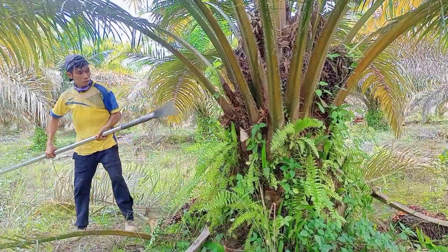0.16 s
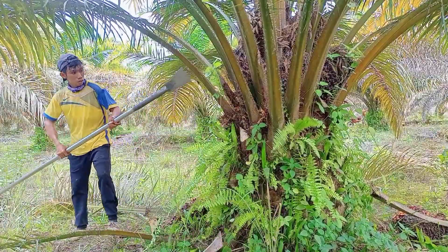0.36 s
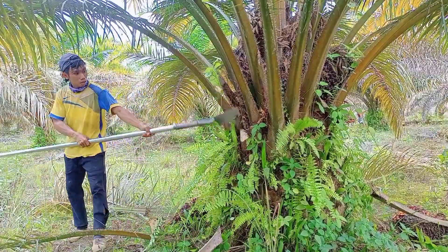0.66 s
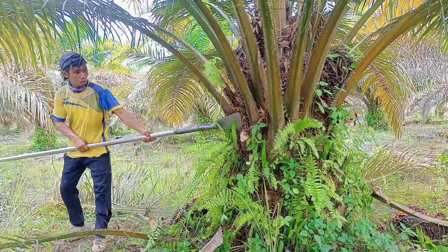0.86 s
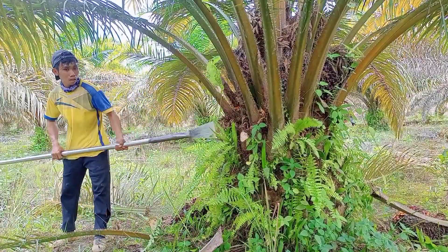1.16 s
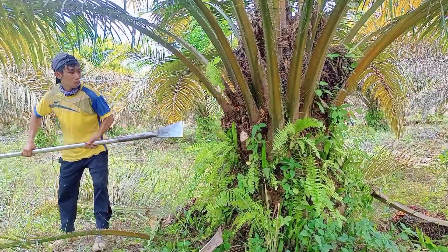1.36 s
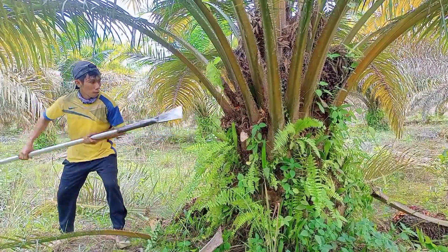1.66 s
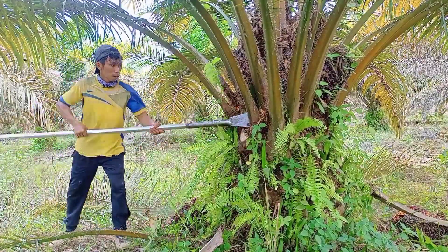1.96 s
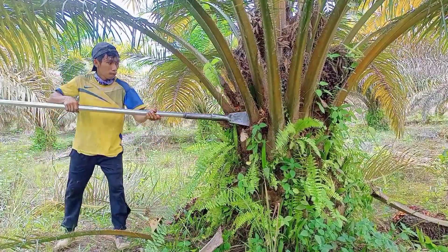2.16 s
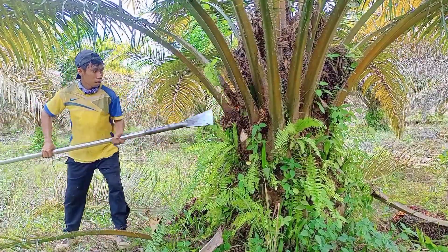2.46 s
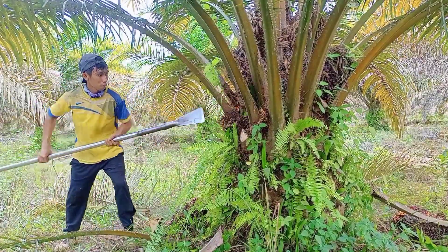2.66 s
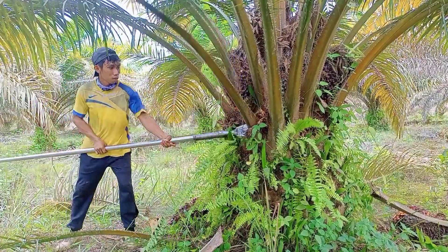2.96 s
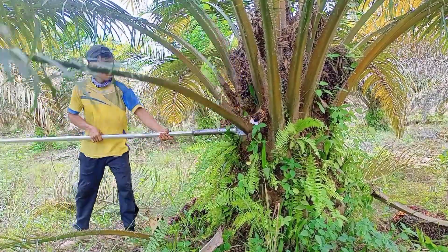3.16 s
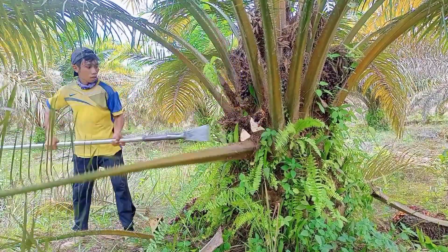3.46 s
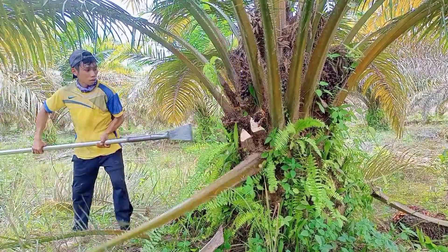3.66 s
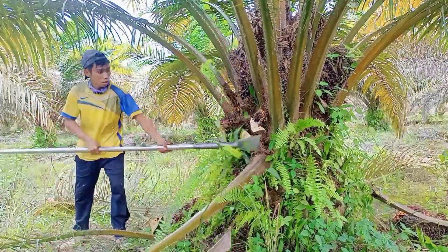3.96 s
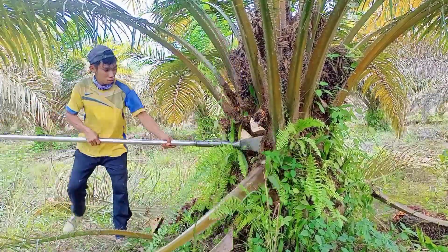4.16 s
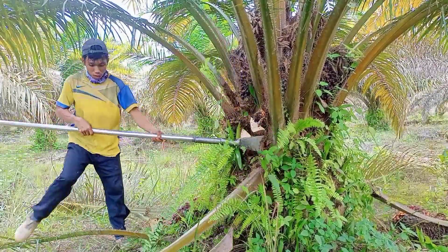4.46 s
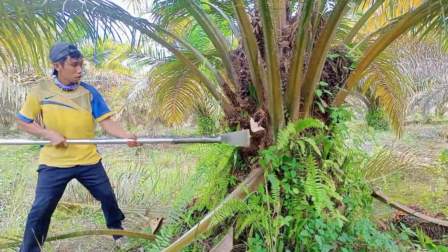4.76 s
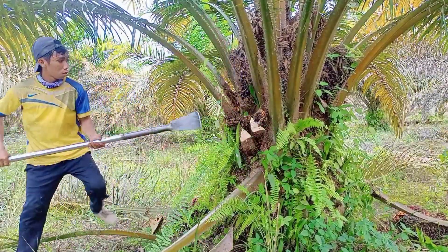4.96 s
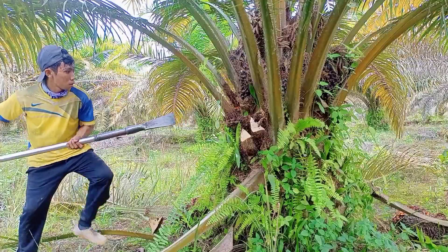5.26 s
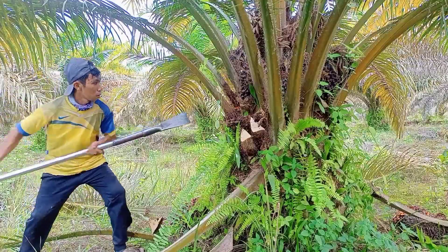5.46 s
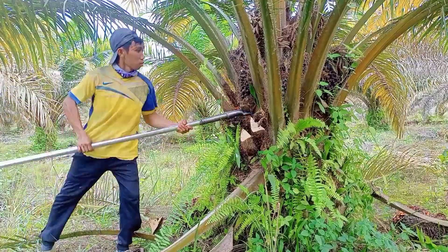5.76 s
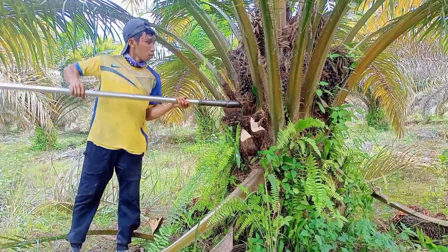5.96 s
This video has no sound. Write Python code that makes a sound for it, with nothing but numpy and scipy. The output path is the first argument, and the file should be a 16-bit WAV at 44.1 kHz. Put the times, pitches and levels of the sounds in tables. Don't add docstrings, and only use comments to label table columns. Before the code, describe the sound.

In a breezy plantation with faint insects, a long-poled steel chisel chops wet palm stalks with sharp crunching thuds, leaves rustling, then splintering and a short creak.

```python
import sys
import numpy as np
from scipy import signal
from scipy.fft import rfft, irfft
from scipy.io import wavfile
from scipy.ndimage import uniform_filter1d

SR = 44100
rng = np.random.default_rng(int(sys.argv[2]) if len(sys.argv) > 2 else 0)


def boost(x):
    u = np.asarray(x, float) / 20
    return 10 ** u


def materialize(psi):
    bounded = np.clip(np.atleast_2d(psi).T, -1, 1)
    quanta = np.round(bounded * 32767).astype(np.int16)
    wavfile.write(sys.argv[1], SR, quanta)


N = 269892

# start_s, effort_db
LEVER = [
    (5.39, -82),
    (5.47, -41.5),
    (5.58, -45),
    (5.66, -40),
    (5.71, -39),
    (5.76, -39),
    (5.9, -42),
    (5.97, -56),
    (6.12, -57.5),
]


def unit(x):
    return x / np.sqrt(np.mean(x ** 2))


def band(x, hz, width_hz):
    hz = min(hz, .45 * SR)
    return signal.lfilter(*signal.iirpeak(hz, max(hz / width_hz, .3), fs=SR), x)


def cut(x, hz, kind):
    return signal.lfilter(*signal.butter(2, hz, kind, fs=SR), x)


def colour(x, points):
    hz, db = np.transpose(points)
    bins_hz = np.fft.rfftfreq(8192, 1 / SR)
    log_gain = np.interp(np.log(bins_hz + 1), np.log(hz), db) * np.log(10) / 20
    cepstrum = irfft(log_gain)
    cepstrum[1:4096] *= 2
    cepstrum[4097:] = 0
    response = irfft(np.exp(rfft(cepstrum)))
    return signal.fftconvolve(x, response)[:len(x)]


def walk(rate):
    k = int(SR / rate)
    held = np.repeat(rng.standard_normal(N // 40 + 2)[:N // k + 1], k)
    return 1.3 * uniform_filter1d(uniform_filter1d(held, k), k)[:N]


def crackle(scatter_db, grain_s):
    size = boost(scatter_db * np.minimum(rng.exponential(size=N // 8), 5))
    place = (np.arange(N) / max(grain_s * SR, 8)).astype(int)
    return unit(size[place] * rng.standard_normal(N))


def fade(t60):
    t = np.arange(int(max(t60, .004) * SR)) / SR
    return t, boost(-60 * t / t60)


def add(out, s, x):
    i = int(s * SR)
    out[i:i + len(x)] += x[:N - i]


def both(*db):
    return 10 * np.log10(sum(boost(d) ** 2 for d in db))


def plantation():
    # pitch_hz, level_db (per Hz)
    air = [(15, -48.5), (25, 5), (192, -4), (265, -9), (516, -11), (649, -22.5), (711, -20.5),
           (2340, -15.5), (6000, -32), (7800, -41.5), (13200, -120)]
    # pitch_hz, width_hz, level_db
    insects = [
        (7360, 620, -58.5),
        (15400, 1400, -61),
    ]
    out = boost(-60.0 + 2.5 * walk(3.4)) * unit(colour(rng.standard_normal(N), air))
    for hz, width_hz, db in insects:
        song = band(band(rng.standard_normal(N), hz, width_hz), hz, width_hz)
        out = out + boost(db + 1.5 * walk(5.4)) * unit(song)
    return out


def motion():
    # start_s, shake_db, dryness_db
    shaking = [(0, -37, 3.5), (.12, -46.5, 4.5), (.4, -57, -0.5), (.49, -47, 1.5), (.62, -61, 2),
               (1.52, -69.5, 6.5), (1.63, -43.5, 2), (1.9, -40.5, -1), (2.5, -50.5, 0), (2.62, -41.5, 4),
               (2.73, -34, -1.5), (3.06, -41, 2), (3.17, -39, 0), (3.561, -36.5, 2.5), (3.72, -37, -2.5),
               (4.069, -48.5, 0.5), (4.4, -58, -2), (5.1, -71.5, -0.5)]
    # start_s, level_db
    shudders = [(0, -57), (.14, -59), (.3, -60), (0.463, -33.5), (1.2, -59.5), (1.56, -28.5), (1.8, -62),
                (2.574, -27), (3.14, -50), (3.55, -53), (3.736, -31.5), (3.82, -48), (4.4, -55),
                (4.45, -53), (2.0, -57), (2.2, -59), (4.04, -60), (5.25, -59), (5.37, -32), (5.53, -46),
                (5.74, -44)]
    ground_db, rise_s, shudder_t60_s = -66, .018, .21
    sway_db, sway_slope = -47, 0.81
    hiss_db = -7.5
    lever_sway_db, lever_hiss_db = -3, -10.5
    t = np.arange(N) / SR
    s, shake, dryness = np.transpose(shaking)
    shake, dryness = np.interp(t, s, shake), np.interp(t, s, dryness)
    effort = np.interp(t, *np.transpose(LEVER))

    rumble = np.full(N, boost(ground_db))
    since, decay = fade(shudder_t60_s)
    for s, db in shudders:
        add(rumble, s, boost(db) * decay * (1 - np.exp(-since / rise_s)) * 3)

    rustle = both(shake, effort)
    sway = both(sway_db + sway_slope * (shake + 40), effort + lever_sway_db)
    hiss = both(shake + hiss_db + dryness, effort + lever_hiss_db)
    return rustle, sway, hiss, 20 * np.log10(rumble)


def leaves():
    rustle_db, sway_db, hiss_db, rumble_db = motion()
    rumble = band(band(rng.standard_normal(N), 115, 110), 115, 110)
    out = boost(rumble_db + 1.5 + 1.5 * walk(20)) * unit(cut(rumble, 49, "high"))
    groups = ((sway_db, (200, 350, 600), -3.0, 1.5),
              (rustle_db, (966, 1660, 2580, 3440), -4.0, 2.5),
              (hiss_db, (5800, 8600, 12100, 16500), 7.0, 2.5))
    for db, centres, lift_db, scatter_db in groups:
        grains, swell = crackle(scatter_db, 0.00092), walk(24)
        for hz in centres:
            wide_db = 10 * np.log10(hz / centres[2])
            level_db = db + lift_db + wide_db + .7 * swell + 1.6 * walk(40)
            out = out + boost(level_db) * unit(band(grains, hz, .6 * hz))
    return out


def blade():
    # start_s, level_db, treble_db, t60_s, pitch_hz
    bites = [(0.463, -32, 9, 0.022, 1890), (1.045, -45.5, 6.5, 0.29, 9500),
             (1.5595, -11, -4.5, 0.013, 1010), (1.566, -16.5, 0, 0.08, 3400),
             (1.579, -20.5, 3.5, 0.079, 1390), (1.7984, -19, -20, 0.05, 2035),
             (2.566, -9, -0.5, 0.039, 2220), (3.724, -22.5, -12, 0.037, 2480),
             (3.735, -14, 0.5, 0.058, 2290), (4.26, -37.5, 7.5, 0.072, 2000),
             (5.356, -23, 7.5, 0.049, 2800), (5.362, -11, 4.6, 0.13, 2050), (5.742, -18, 0, .019, 1010),
             (5.749, -21.5, 1, 0.048, 3700), (5.854, -27, 1, 0.048, 1900)]
    # start_s, level_db, treble_db, hold_s, pitch_hz
    drives = [
        (0.4, -57, 14, .025, 3000),
        (0.436, -38.5, 3.5, 0.048, 1720),
        (2.578, -12.5, -13, 0.024, 2110),
        (5.234, -51, -3, 0.036, 2180),
        (5.381, -22.5, -9, 0.015, 2780),
        (4.412, -47.5, .2, 0.037, 3000),
    ]
    bite_hold_s, drive_t60_s = 0.0058, 0.072
    out, fibres = np.zeros(N), crackle(1.4, .0004)
    cuts = [(s, db, treble_db, bite_hold_s, t60, hz) for s, db, treble_db, t60, hz in bites]
    cuts += [(s, db, treble_db, hold, drive_t60_s, hz) for s, db, treble_db, hold, hz in drives]
    chance = rng.standard_normal((len(cuts), 2048))
    for row, (s, db, treble_db, hold, t60, hz) in zip(chance, cuts):
        rise = np.linspace(0, 1, int(.0016 * SR))
        push = np.concatenate([rise, np.ones(int(hold * SR)), fade(t60)[1]])
        tear = push * unit(fibres[int(s * SR):][:len(push)])
        ring = fade(.005)[1]
        modes = ring * row[:len(ring)]
        modes[0] += 10
        crushed = band(tear, hz, 1.21 * hz) + 0.9 * band(tear, 570, 1200)
        body = np.convolve(crushed, modes / np.linalg.norm(modes))[:len(tear)]
        add(out, s, boost(db) * (2.026 * body + boost(treble_db) * cut(tear, 2300, "high")))
    return out


def snaps():
    # start_s, level_db, treble_db,
    # pitch_hz
    dry_bits = [(0.4377, -39, -44, 1110), (0.684, -35, -55, 4000), (1.043, -42, -38.5, 4280),
                (1.0466, -29, -38.5, 4730), (1.074, -45, -52, 4470), (1.1104, -47.5, -46.5, 2580),
                (1.123, -37.5, -54.5, 1850), (1.2343, -37.5, -55, 1750), (1.2444, -41.5, -56.5, 2070),
                (1.5182, -39, -52, 2290), (1.8833, -19, -45, 2600), (1.7987, -16, -52, 2390),
                (2.0094, -31, -42, 1880), (2.0564, -42, -50, 3470), (2.1021, -24, -45, 2680),
                (2.539, -42.5, -40.5, 1770), (2.6028, -4.5, -35, 2680), (2.7023, -23.5, -34, 1450),
                (2.7512, -14, -36, 1510), (2.7988, -21, -42.5, 1890), (2.8344, -27, -43, 3640),
                (3.096, -16.5, -36.5, 2260), (3.15, -21.5, -36, 2100), (3.4313, -20, -47, 2570),
                (3.5263, -19.5, -41, 2000), (3.6051, -19.5, -39, 1240), (3.7369, -4.5, -28, 2060),
                (4.0009, -22.5, -52.5, 2520), (4.2589, -21.5, -36.5, 2630), (4.3931, -20, -51, 2450),
                (5.2327, -36, -61, 1960), (5.4907, -17, -33, 2200), (5.5444, -27, -51, 2280),
                 (5.5856, -18.5, -35.5, 3000), (5.6114, -22, -41, 2354), (5.6518, -15.5, -24, 3500),
                 (5.6701, -37, -39, 1930), (5.7056, -23, -22.5, 2204), (5.7208, -8.5, -22.5, 3330),
                 (5.7275, -15, -44, 1500), (5.7915, -3, -41, 3620), (5.8126, -20, -45, 2287),
                 (5.8546, -23.5, -39, 1410), (5.9004, -22.5, -30, 1310), (5.9683, -35, -48, 1200),
                 (6.1043, -33, -49, 2160)]
    crumbs_db, crumbs_t60_s = -8.5, .045
    port_loss_db = 19.5
    out, crumbs = np.zeros(N), crackle(1.7, 0.00034)
    t, decay = fade(crumbs_t60_s)
    for s, db, treble_db, hz in dry_bits:
        shower = crumbs[int(s * SR) - len(t):][:len(t)]
        click = np.exp(-t / .0004) * shower + 5 * (t == 0)
        voices = ((band(click, hz, hz), band(shower, hz, hz), db),
                  (cut(click, 4500, "high"), cut(shower, 4500, "high"), treble_db + port_loss_db))
        for crack, fall, peak_db in voices:
            crack = crack / np.abs(crack).max()
            add(out, s + .0007, boost(peak_db) * (2 * crack + boost(crumbs_db) * decay * unit(fall)))
    return out


def steel():
    # start_s, pitch_hz, level_db, t60_s
    rings = [(0.438, 1720, -39, 0.09), (0.469, 1018, -24, 0.12), (.466, 2034, -26, 0.088),
             (.467, 2420, -44, 0.16), (0.475, 3050, -36, 0.1), (.467, 3620, -28, 0.096),
             (1.561, 2317, -6, 0.037), (1.568, 3420, -9.5, 0.031), (1.567, 4060, -16, 0.045),
             (1.7992, 2300, -10, 0.02), (1.562, 2046, -13, .04), (2.567, 2330, -2.5, 0.03),
             (2.568, 1730, -4, 0.026), (2.568, 1430, 1, 0.022), (3.727, 2760, -9, 0.026),
             (3.7365, 3760, -7.5, 0.028), (4.475, 3585, -60, 1.43), (4.542, 1910, -64.5, .5),
             (5.233, 1975, -56.5, .5), (5.366, 1944, -8.5, 0.052), (5.412, 1965, -45, 1.4),
             (5.749, 2580, -10.5, 0.039), (5.904, 1330, -35, 0.074)]
    out, grip = np.zeros(N), walk(60)
    for s, hz, db, t60 in rings:
        t, decay = fade(t60)
        add(out, s, boost(db) * decay * (1 - np.exp(-t / .001)) * np.sin(2 * np.pi * hz * t))
    return out * boost(2.2 * grip)


def stalk():
    # start_s, level_db, pitch_hz, t60_s
    thuds = [(.465, -11.5, 395, 0.064), (.475, -16.5, 718, 0.033), (0.478, -23, 203, 0.074),
             (0.518, -32, 415, 0.12), (1.123, -37.5, 413, 0.015), (1.258, -43, 203, 0.081),
             (1.5615, 2.5, 513, 0.022), (1.564, -9, 199, 0.12), (1.576, -16, 1016, 0.053),
             (1.585, -11.5, 870, 0.059), (1.803, -17, 450, 0.04), (2.568, -6.5, 902, 0.12),
             (2.573, -12, 904, 0.13), (2.578, -6, 503, 0.037), (3.066, -29, 460, 0.073),
             (3.7372, -3, 774, .022), (3.743, -24.5, 565, 0.043), (4.263, -29.5, 730, 0.035),
             (4.395, -28.5, 362, 0.023), (4.441, -24.5, 246, 0.011), (5.253, -32.5, 467, 0.024),
             (5.364, 1, 455, 0.016), (5.369, -5.5, 697, 0.046), (5.38, -19, 1274, 0.047),
             (5.391, 0.2, 428, 0.034), (5.405, -7.5, 218, .036), (5.725, -20.5, 500, 0.04),
             (5.747, -11.5, 963, 0.028), (5.86, -18.5, 840, 0.023)]
    push_share = .03
    out, chance = np.zeros(N), rng.standard_normal((len(thuds), 64))
    for (s, db, hz, t60), wobble in zip(thuds, chance):
        t, decay = fade(t60)
        wander = np.interp(t * hz / 2, np.arange(64), wobble)
        swing = np.sin(2 * np.pi * hz * t + .5 * wander)
        add(out, s, boost(db) * decay * (1 - np.exp(-t / (push_share * t60))) * swing)
    return out


def hollow():
    hz, width_hz, hum_db = 454, 130, -3
    effort_db = np.interp(np.arange(N) / SR, *np.transpose(LEVER))
    hum = band(band(crackle(3, 0.0046), hz, width_hz), hz, width_hz)
    return boost(effort_db + hum_db + 2.2 * walk(30)) * unit(hum)


def creak():
    # start_s, level_db
    loudness = [
        (5.57, -18.5),
        (5.62, -18.5),
        (5.655, -19),
        (5.68, -24),
        (5.70, -31),
    ]
    start_s, first_gap_s, quicken_s, last_gap_s = 5.5768, .0143, .001, .005
    gaps = np.maximum(first_gap_s - quicken_s * np.arange(15), last_gap_s)
    slips = start_s + np.append(0, np.cumsum(gaps))
    out, (t, decay) = np.zeros(N), fade(.018)
    for s, chance in zip(slips, rng.standard_normal((16, 2048))):
        hz = (1 + .04 * chance[0]) * (1450 + 1200 * np.exp(-t / .0014))
        scrape = unit(band(chance[2:len(t) + 2], 2000, 1300))
        knock = np.sin(2 * np.pi * np.cumsum(hz) / SR) + .25 * scrape
        level_db = np.interp(s, *np.transpose(loudness)) - 0.1 + 0.83 * chance[1]
        add(out, s, boost(level_db) * decay * knock)
    return out


def trunks(x, t60=0.13, wet_db=-22):
    t, decay = fade(t60)
    echo = decay * (1 - np.exp(-t / 0.0076)) * rng.standard_normal(SR)[:len(t)]
    return x + boost(wet_db) * signal.fftconvolve(x, echo / np.linalg.norm(echo))[:N]


def scene():
    work = blade() + snaps() + steel() + stalk() + creak()
    return (plantation() + leaves() + trunks(work) + hollow())[None]


def low_pass(x):
    return signal.sosfilt(signal.butter(12, 16970, fs=SR, output="sos"), x)


def record(dry):
    # pitch_hz, level_db
    port = [(20, -40.5), (60, -9.5), (150, -5.5), (500, -2.5), (2700, -2.5), (4000, -7), (5300, -15),
            (6550, -18), (7600, -16), (8800, -7), (10200, -17), (12300, -21.5), (14000, -16.5),
            (15300, -12)]
    top_hz = 15750
    heard = colour(dry[0], port)
    heard = heard / (1 + (heard / .97) ** 6) ** (1 / 6)
    pass_top = np.clip((np.fft.rfftfreq(N, 1 / SR) - top_hz) / 150 + .5, 0, 1)
    top = irfft(rfft(heard) * pass_top, N)
    quick = uniform_filter1d(cut(heard, 8300, "high") ** 2, size=128)
    before = uniform_filter1d(quick, size=2048, origin=1023)
    attack = uniform_filter1d(1. * (quick > 9.0 * before), size=256) > 0
    opening = boost(-19.5) * uniform_filter1d(1. * attack, size=256)
    finished = (heard - top * (1 - opening))[None]
    return low_pass(finished)


dry = scene()
out = record(dry)
materialize(out)
```